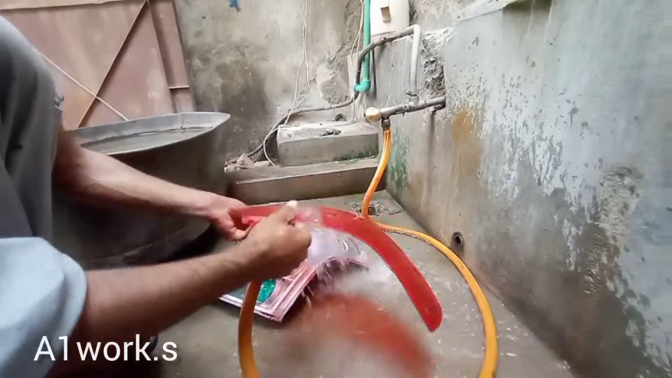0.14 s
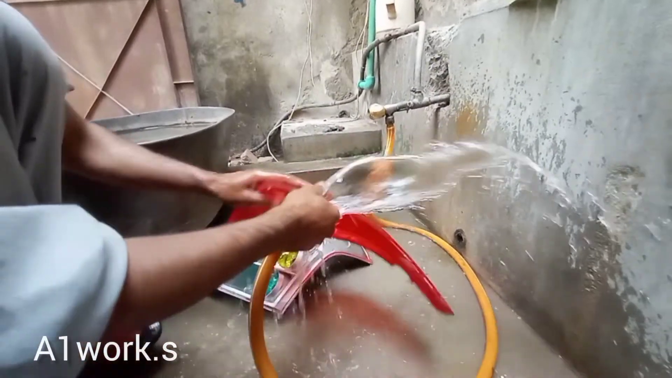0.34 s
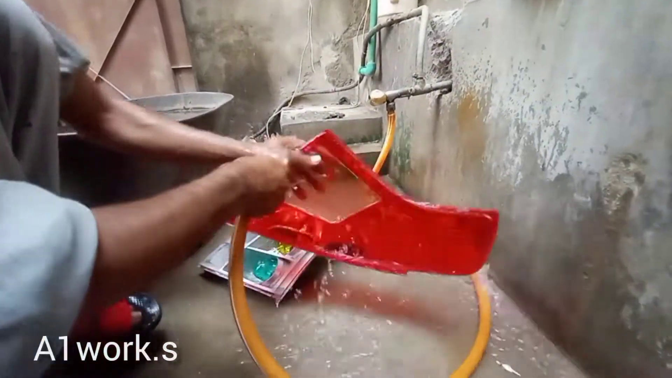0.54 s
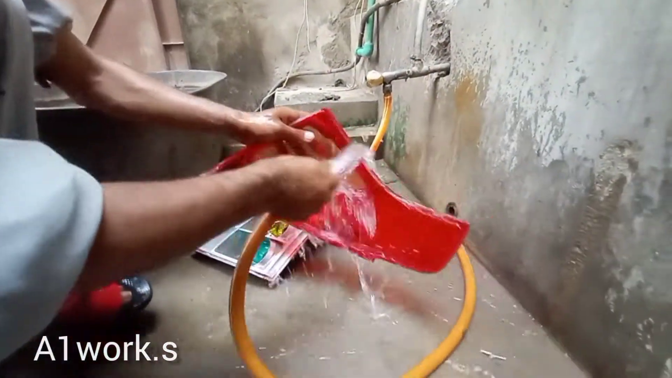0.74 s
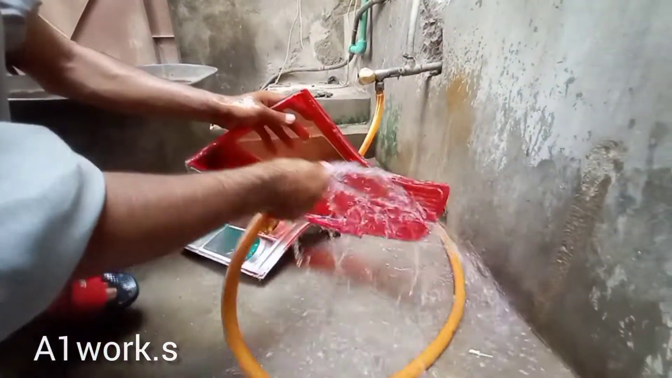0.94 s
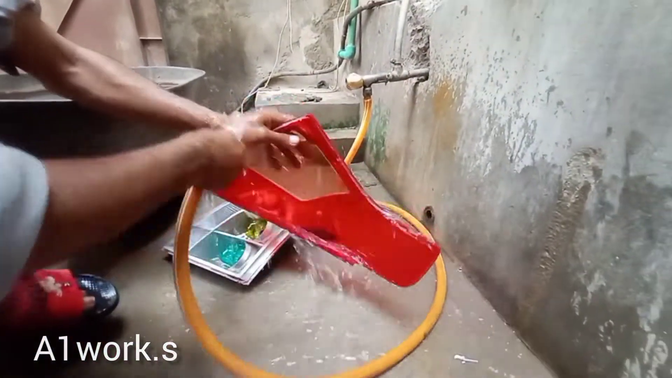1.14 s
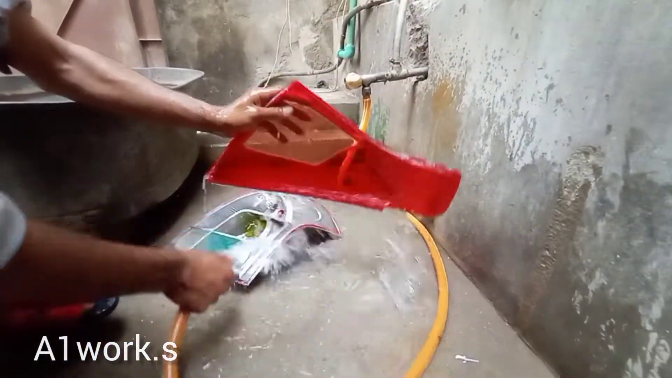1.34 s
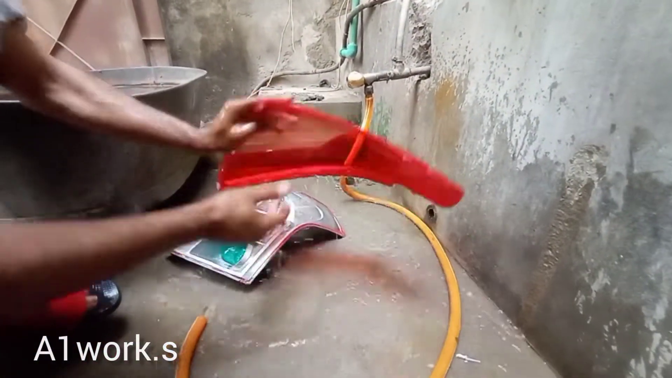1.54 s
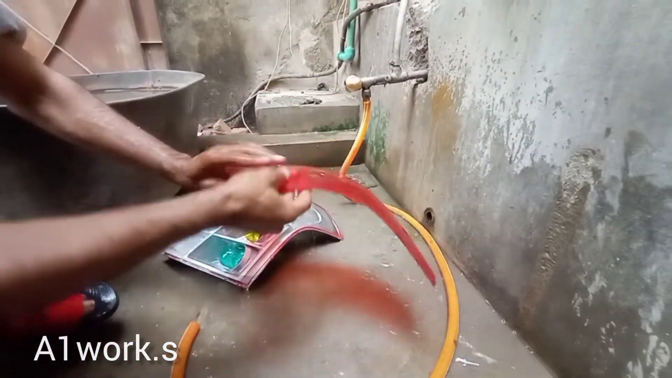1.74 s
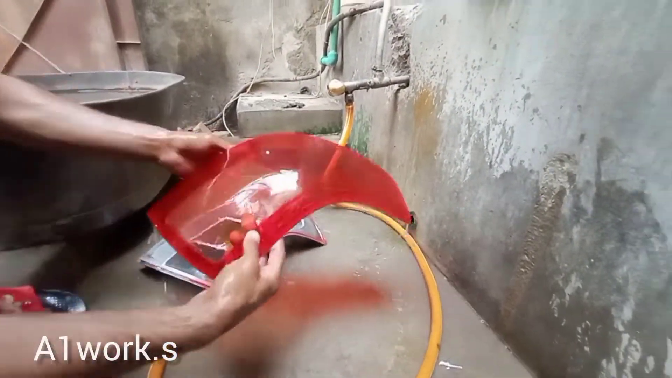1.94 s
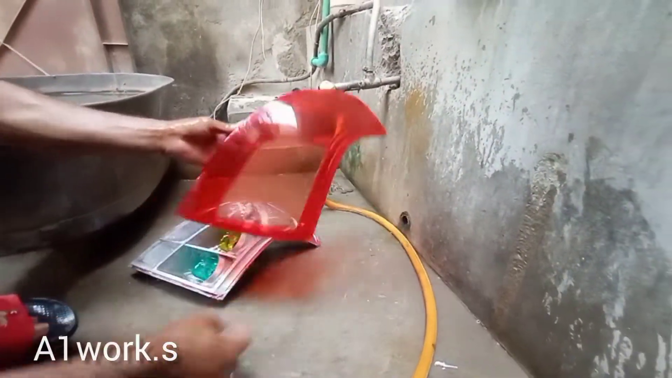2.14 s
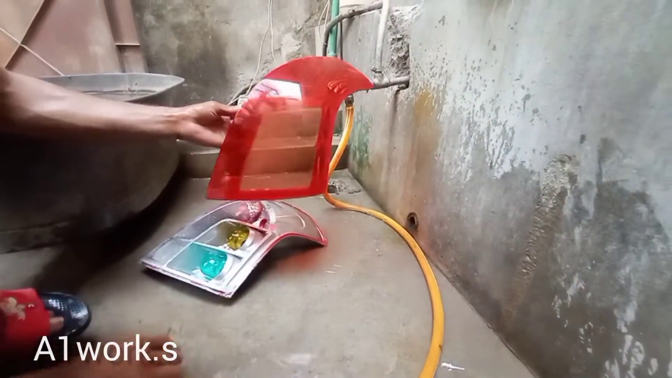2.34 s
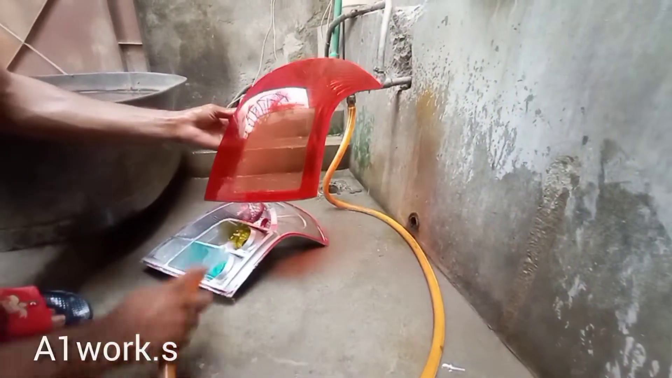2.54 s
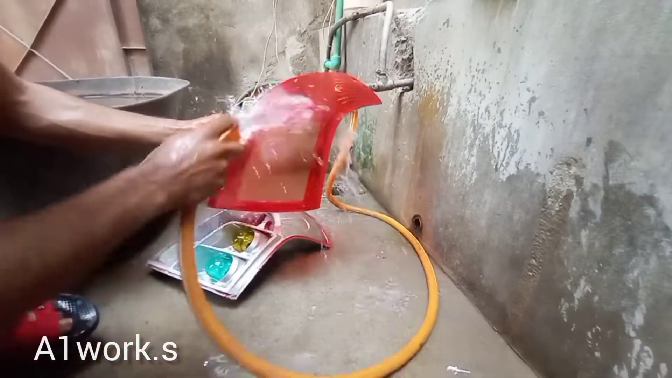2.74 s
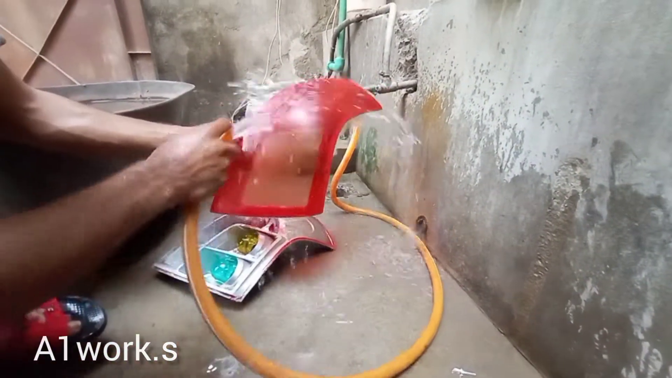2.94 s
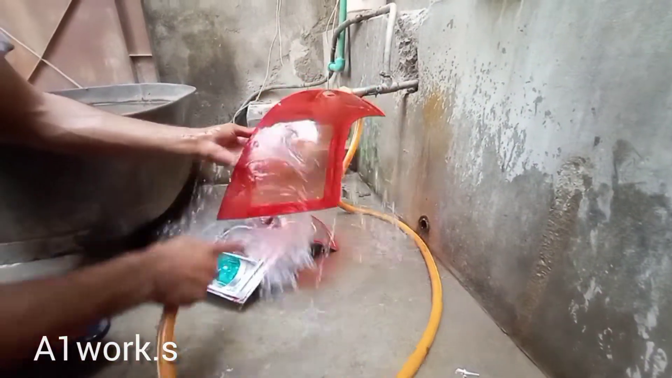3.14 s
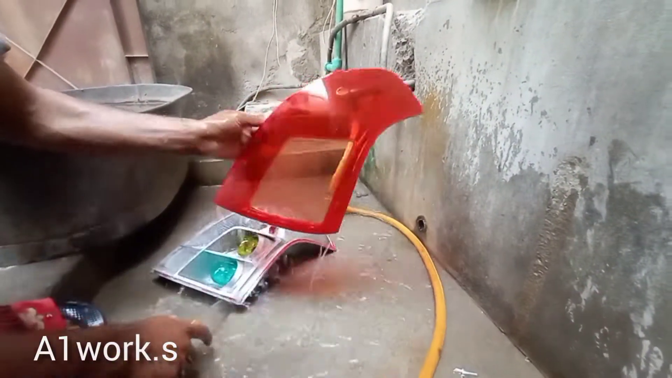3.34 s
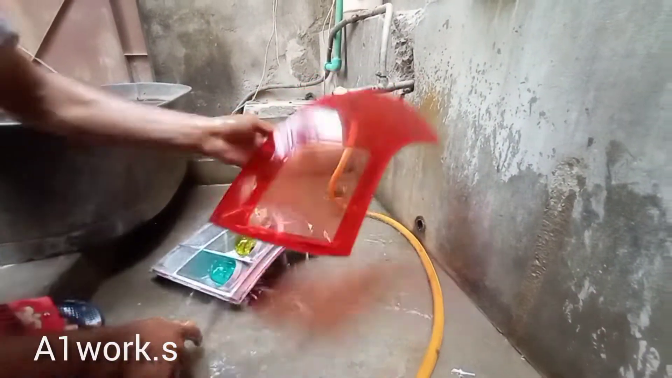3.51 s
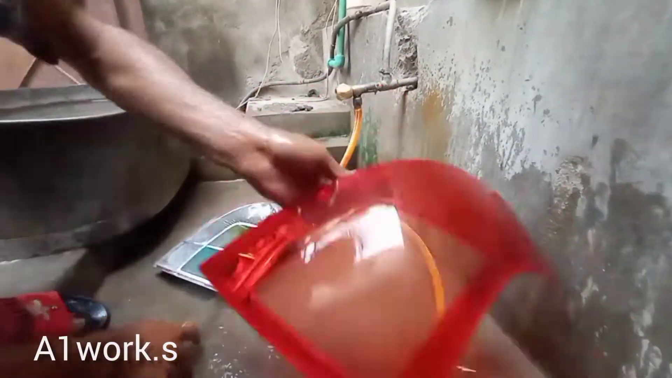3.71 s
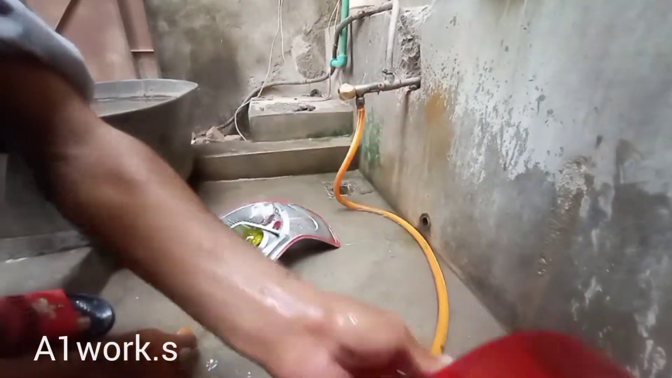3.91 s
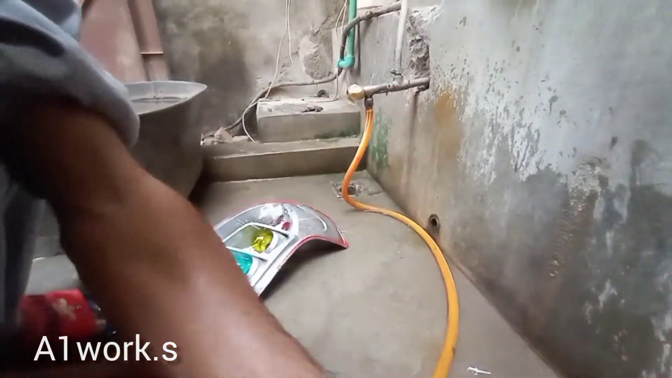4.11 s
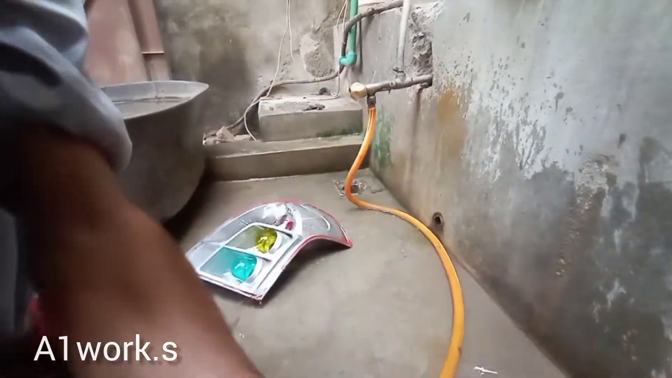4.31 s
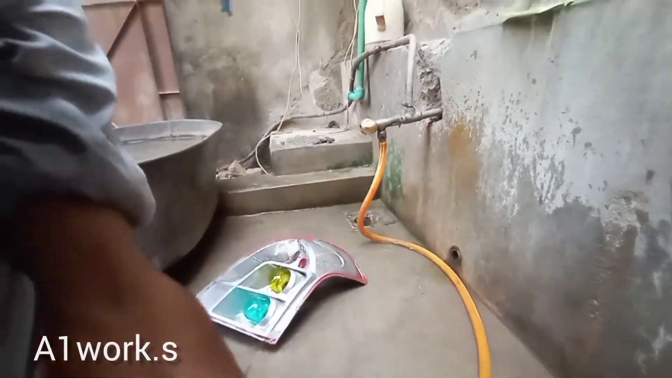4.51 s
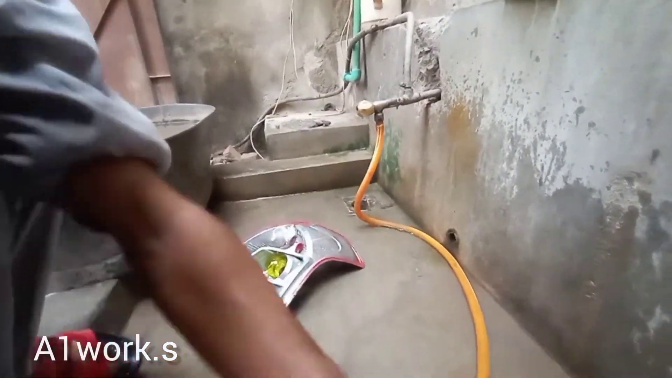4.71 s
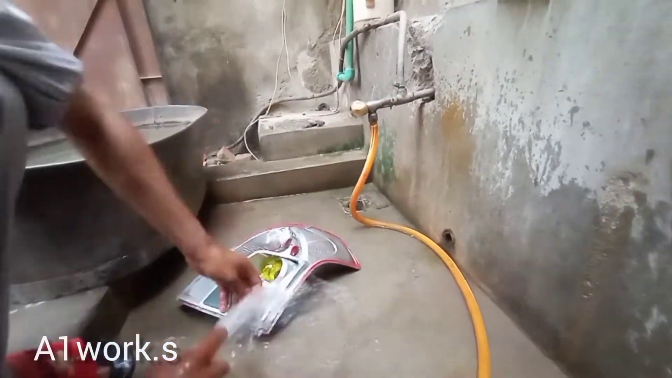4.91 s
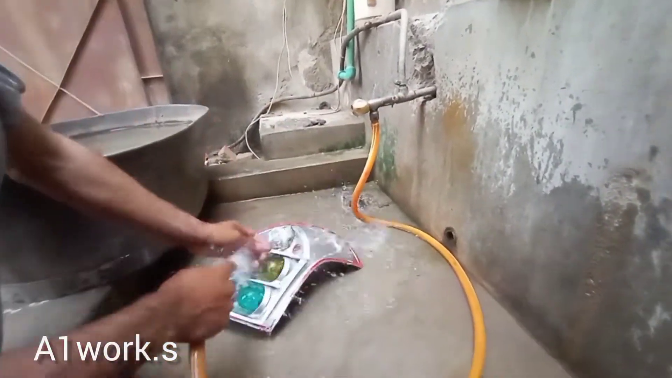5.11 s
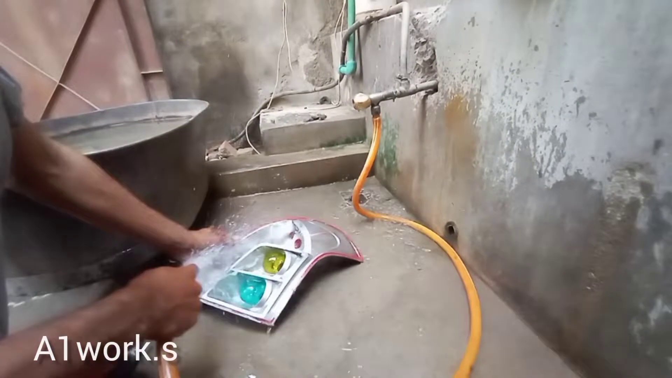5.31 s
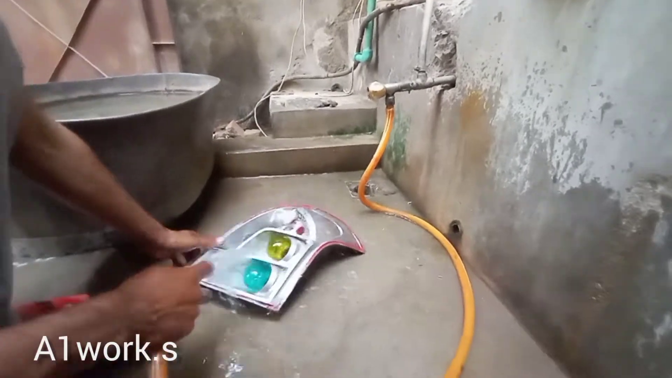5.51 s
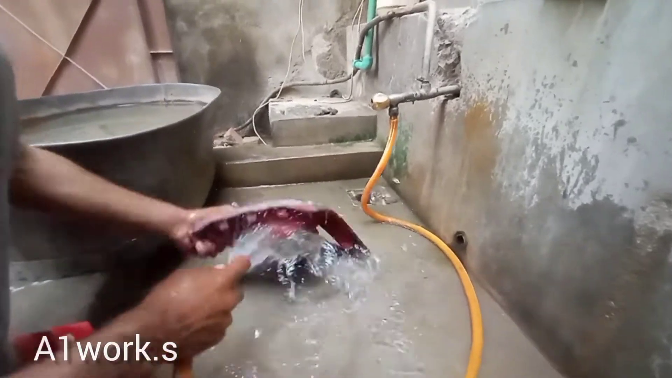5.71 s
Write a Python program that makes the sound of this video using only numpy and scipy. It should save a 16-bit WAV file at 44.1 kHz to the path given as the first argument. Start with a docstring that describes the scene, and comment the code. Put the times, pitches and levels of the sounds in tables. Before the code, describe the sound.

A hose rinses plastic parts in splashy, bubbling bursts, broken by soft hissing, dripping and a shell clattering onto concrete.

```python
"""Water spatters on and off a plastic lamp lens and gurgles over a hand, as a hose rinses the lens in
a small concrete wash yard. Drops tick as they land, and trapped air rings as bubbles.
Between rinses the open hose hisses on the floor, with a low hum like a water pump behind it.
The lens is put down with a clatter; then the jet plays on the lamp housing, which is tipped over
and drums hollowly."""
import sys
import numpy as np
from scipy import signal
from scipy.fft import rfft, irfft, next_fast_len
from scipy.io import wavfile
from scipy.ndimage import uniform_filter1d, map_coordinates

SR = 44100
rng = np.random.default_rng(int(sys.argv[2]) if len(sys.argv) > 2 else 0)


def store_pcm(level_fs):
    """Save levels as 16-bit WAV."""
    pcm = np.round(np.clip(level_fs, -1, 1) * 32767).astype(np.int16)
    wavfile.write(sys.argv[1], SR, np.atleast_2d(pcm).T)


N = 258426
SPRAY_ATTACK_S, SPRAY_RELEASE_S = 0.0064, 0.0031  # how fast a burst of spray starts and stops


def amp(db):
    """Turn decibels into a gain to multiply by."""
    return 10 ** (np.asarray(db) / 20)


def unit(x):
    """Scale x to an average strength (rms) of 1."""
    return x / np.sqrt(np.mean(x ** 2) + 1e-20)


def noise(size=N):
    """White noise: an even hiss."""
    return rng.standard_normal(size)


def along(points, hz):
    """Read between (frequency [Hz], value) points, with octaves evenly spaced."""
    freqs, values = np.transpose(points)
    return np.interp(np.log(hz + 1), np.log(freqs), values)


def curve(rows):
    """Join (time [s], value) points with straight lines, one value per sample."""
    return np.interp(np.arange(N) / SR, *np.transpose(rows))


def spells(rows, attack_s, release_s):
    """Gain of (start [s], length [s], level [dB]) events that rise, hold and die away."""
    t = np.arange(N) / SR
    return sum(amp(db) * np.clip((t - s) / attack_s, 0, 1)
               * np.exp(-np.maximum(t - s - length, 0) / release_s) for s, length, db in rows)


def wobble(rate):
    """A smooth curve through `rate` random values a second."""
    return map_coordinates(noise(int(N * rate / SR) + 4), [np.arange(N) * rate / SR])


def filtered(x, response):
    """Multiply each frequency in x by response(frequency)."""
    size = next_fast_len(len(x) + SR // 4)
    return irfft(rfft(x, size) * response(np.fft.rfftfreq(size, 1 / SR)), size)[:len(x)]


def coloured(x, points):
    """Shape the tone of x with (frequency [Hz], level [dB]) points."""
    return filtered(x, lambda f: amp(along(points, f)))


def tilted(x, slope_db):
    """Brighten or darken x by slope_db per octave, pivoting at 1 kHz."""
    return filtered(x, lambda f: amp(slope_db * np.log2(np.maximum(f, 300) / 1000)))


def resonate(x, modes, order=1):
    """Ring x through (pitch [Hz], width [Hz], level [dB]) resonances; order 2 deepens the valleys."""
    return filtered(x, lambda f: sum(
        (-1) ** k * (amp(db) * 1j * f * width / (hz * hz - f * f + 1j * f * width)) ** order
        for k, (hz, width, db) in enumerate(modes)))


def patchy(x, depth_db):
    """Give x random loud and soft patches, a few hundred Hz wide and some tens of ms long."""
    spectra = signal.stft(x, nperseg=512)[2]
    patches = uniform_filter1d(noise(spectra.shape), size=6, axis=0)
    patches = uniform_filter1d(patches, size=7, axis=1)
    return signal.istft(spectra * amp(depth_db * unit(patches)), nperseg=512)[1][:N]


def add(track, s, sound):
    """Mix a sound into the track, starting at s seconds."""
    part = track[max(round(s * SR), 0):][:len(sound)]
    part += sound[:len(part)]


def pings(start, hz, gain, cycles, rise, total, size):
    """Mix tones of `size` samples that fade over `cycles` and climb by the share `rise` in pitch."""
    t = np.arange(size) / SR
    hz = np.clip(hz, 200, 15000)[:, None]
    age = t * hz / cycles
    envelope = gain[:, None] * np.exp(-age) * (1 - np.exp(-2 * t * hz))
    waves = envelope * np.sin(2 * np.pi * hz * t * (1 + rise * np.tanh(age / 2)))
    index = (start * SR).astype(int)[:, None] + np.arange(size)
    return np.bincount(index.ravel(), waves.ravel(), total)[:total]


def shower(hz, octaves, cycles, rise, spread_db, count, size):
    """Drops or bubbles at random times, a few much larger than the rest, at an even average level."""
    when, pitch, rank = rng.random((count, 3)).T
    gain = amp(-spread_db * np.log(np.maximum(rank, .01)))
    x = pings(when * N / SR, hz * 2 ** (octaves * (2 * pitch - 1)), gain, cycles, rise, N, size)
    return x / np.sqrt(np.abs(uniform_filter1d(x * x, size=4000)) + 1e-9)


def bursts(rows, octaves, cycles, rise, count, size):
    """A quick, fading cluster of pings for each (time [s], peak [dB], pitch [Hz], length [s]) row."""
    out = np.zeros(N)
    for s, db, hz, length in rows:
        late = (np.arange(count) + rng.random(count)) / count
        gain = np.exp(-2 * late) * np.minimum(late * 6 + 0.77, 1) * rng.choice([-1, 1], count)
        pitch = hz * 2 ** (octaves * rng.permutation(np.linspace(-1, 1, count)))
        cluster = pings(late * length, pitch, gain, cycles, rise, SR // 10, size)
        add(out, s, amp(db) * cluster / np.abs(cluster).max())
    return out


def yard(x):
    """The close concrete walls answer with a short echo whose treble dies first."""
    # how long the echo lasts: (frequency [Hz], time to fade by 60 dB [s])
    fade_times = [(200, 0.41), (2000, 0.1), (12000, 0.013)]
    hz, t, spectra = signal.stft(noise(SR // 3), SR, nperseg=256)
    tail = signal.istft(spectra * amp(-60 * t / along(fade_times, hz)[:, None]), SR, nperseg=256)[1]
    delayed = np.pad(x, (SR // 200, 0))
    return signal.fftconvolve(delayed, tail / np.linalg.norm(tail))[:N]


def drone():
    """A pump-like hum comes and goes, with a low rumble that partly follows it."""
    # spells of humming: (start [s], length [s], relative level [dB])
    hum_spells = [(0, 0.14, -55), (.25, 0.43, -53.5), (.92, 0.34, -56), (1.55, 0.18, -55.5),
                  (1.77, 0.2, -56), (2.14, 0.29, -59), (2.68, 0.061, -62), (2.86, 0.21, -56.5),
                  (3.15, 0.19, -55), (3.42, 0.12, -58.5), (3.64, 0.356, -54), (4.2, 0.45, -63.5),
                  (4.43, 0.011, -56.5), (4.6, 0.16, -51.5), (4.88, 0.037, -55), (5.02, 0.2, -54),
                  (5.29, 0.33, -54)]
    # the yard's rumble: (time [s], base level [dB])
    rumble_levels = [(0, -58), (.65, -57.5), (.76, -55.5), (1, -56.5), (1.22, -54), (1.45, -58), (2.2, -57),
                     (2.8, -56), (3.4, -59.5), (4.2, -56.5), (4.5, -51), (4.95, -54), (5.5, -52.5),
                     (5.86, -57)]
    # its tone: (frequency [Hz], level [dB])
    rumble_tone = [(20, -16), (40, -20.5), (65, -4), (95, 3.5), (125, -2.5), (170, -2.5), (230, -18.5),
                   (400, -45), (1500, -61)]
    hum_hz, idle_db = 145.3, -71.5
    hum_db = 20 * np.log10(np.hypot(amp(idle_db), spells(hum_spells, attack_s=0.0052, release_s=0.011)))
    rumble_db = curve(rumble_levels) + 0.31 * (hum_db - hum_db.mean())
    hum = np.sin(2 * np.pi * np.cumsum(hum_hz + 2.43 * wobble(14)) / SR)
    rumble = unit(coloured(noise(), rumble_tone))
    return amp(hum_db + 6.5 + 2.1 * wobble(25)) * hum + amp(rumble_db) * rumble


def hose():
    """Swirling water hisses in the hose and its mouth; the pitch drifts as the hose flexes."""
    # resonances of the hose: (pitch [Hz], width [Hz], relative level [dB])
    pipe_modes = [(343, 85, 0), (619, 86, 4.5), (1250, 320, -24), (1940, 470, 4), (2223, 166, 8),
                  (3110, 550, 3.5), (4090, 300, -2), (5460, 700, 2)]
    # those of its mouth inside the fist: (pitch [Hz], width [Hz], relative level [dB])
    mouth_modes = [(347, 58, -3), (591, 132, 2), (1124, 196, 0.5), (1856, 270, -7), (2250, 250, -6)]
    # rush of the flow: (time [s], level [dB])
    flow_levels = [(0, -62), (.2, -57), (.35, -57), (.7, -55), (1.15, -65.5), (1.38, -53), (1.75, -57),
                   (2.4, -54.5), (2.75, -58.5), (3.3, -59), (3.63, -61), (3.8, -60.5), (4.05, -57.5),
                   (4.3, -55), (4.6, -56.5), (4.9, -57.5), (5.86, -53.5)]
    # the fist narrows the mouth: (start [s], length [s], level [dB])
    squeezes = [(-.1, 1.54, -60)]
    # the hose's second resonance sings briefly: (start [s], length [s], level [dB])
    hoots = [(1.215, 0.034, -50.5), (1.66, 0.088, -63), (2.0, 0.09, -64), (4.11, 0.085, -59.5),
             (4.72, 0.12, -69.5)]
    open_mouth_db, drift_share = -81, .01
    squeeze = amp(open_mouth_db) + spells(squeezes, attack_s=0.11, release_s=0.41)
    pipe = unit(resonate(patchy(noise(), depth_db=2.8), pipe_modes, order=2))
    mouth = unit(resonate(noise(), mouth_modes, order=2))
    hoot = unit(resonate(noise(), [pipe_modes[1]], order=2))
    hiss = amp(curve(flow_levels) + 0.67 * wobble(30.02)) * pipe
    hiss += squeeze * amp(2.0 * wobble(25.26)) * mouth
    hiss += spells(hoots, attack_s=0.0048, release_s=0.016) * hoot
    lead = np.cumsum(drift_share * wobble(6))  # reading faster or slower bends the pitch
    return map_coordinates(hiss, [np.arange(N) + lead], mode="mirror")


def dribble():
    """Run-off trickles over the wet floor in soft patches, with single drips among them."""
    # the trickle: (time [s], level [dB])
    levels = [(0, -62), (2.4, -69.5), (3.62, -63.5), (3.9, -63), (4.3, -67), (4.58, -76), (4.69, -67),
              (4.76, -55.5)]
    # its tone: (frequency [Hz], level [dB])
    tone = [(400, -30), (1500, -21), (3500, -7.5), (4800, -7.5), (6000, 4.5), (7500, -8), (10000, -16.5),
            (16000, -19.5)]
    runs = shower(hz=3860, octaves=1.0, cycles=20, rise=0, spread_db=2, count=5000, size=800)
    trickle = unit(coloured(patchy(runs + amp(-2.5) * noise(), depth_db=2.6), tone))
    drips = shower(hz=2200, octaves=1.5, cycles=14, rise=.08, spread_db=1.5, count=200, size=1600)
    return amp(curve(levels) + 1.6 * wobble(25)) * (trickle + amp(-8.5) * unit(drips))


def laps():
    """Small runs of water lap on the floor, each swelling and fading around its own pitch."""
    # runs of water: (time [s], level [dB], pitch [Hz], length [s])
    runs = [(1.57, -57, 3950, 0.032), (1.67, -59, 3900, 0.084), (1.92, -59, 5700, 0.086),
            (2.005, -60, 636, 0.13), (2.039, -53, 1800, 0.06), (2.049, -57, 3930, 0.079),
            (2.115, -58.5, 3360, 0.075), (2.205, -56.5, 3760, 0.097), (2.219, -58.5, 620, 0.017),
            (2.444, -57, 5500, 0.054), (3.528, -54.5, 3600, 0.018), (3.658, -59, 3860, 0.11),
            (3.735, -60, 4960, 0.077), (3.894, -63, 4470, 0.083), (4.148, -58.5, 3370, 0.071),
            (4.203, -59, 3670, 0.031), (4.619, -54.5, 1670, 0.051), (4.65, -56.5, 3800, 0.028)]
    width_share = 0.26
    out = np.zeros(N)
    for s, db, hz, length in runs:
        swell = np.hanning(int(length * SR))
        wash = unit(resonate(noise(SR // 4), [(hz, width_share * hz, 0)], order=2))
        add(out, s, amp(db) * swell * unit(wash[:len(swell)]))
    return out


def slop(count=70):
    """A sliding sheet of water traps ever larger bubbles, so its splash falls in pitch."""
    # water leaving the lens: (start [s], length [s], level [dB], first pitch [Hz], last pitch [Hz])
    sheets = [(1.386, .085, -53, 2360, 465)]
    out = np.zeros(N)
    for s, length, db, first_hz, last_hz in sheets:
        late = (np.arange(count) + rng.random(count)) / count
        hz = first_hz * (last_hz / first_hz) ** late * 2 ** rng.normal(0, 0.18, count)
        gain = np.sin(np.pi * late) * rng.choice([-1, 1], count)
        splash = pings(late * length, hz, gain, cycles=1.8, rise=0, total=SR // 5, size=1200)
        add(out, s, amp(db) * splash / np.sqrt(np.sum(splash ** 2) / (length * SR)))
    return out


def gurgle():
    """Crowded bubbles ring in the water that the jet churns; pouring water adds a slosh."""
    # churning in each of the three rinses: (level relative to the jet [dB])
    churn_db = [-15, -6.5, -7]
    # pooled water pours off the plastic: (start [s], length [s], relative level [dB])
    pours = [(.02, 0.08, -59), (.82, 0.062, -55), (1.28, 0.13, -53.5), (1.41, 0.032, -49),
             (1.46, 0.064, -53.5), (1.55, 0.19, -63), (2.01, 0.073, -62.5), (2.76, 0.13, -63),
             (3.3, 0.233, -69.5), (5.13, 0.017, -56), (5.26, 0.057, -49.5), (5.44, 0.12, -56),
             (5.77, 0.14, -50)]
    # tone of its fall on the concrete: (frequency [Hz], level [dB])
    slosh_tone = [(120, -17), (270, -12.5), (450, -11), (800, 2.5), (1400, 9), (2200, 10), (5000, -10),
                  (12000, -35)]
    churn = amp(-88) + amp(churn_db) @ rinses()  # the wet floor always bubbles faintly
    pour = spells(pours, attack_s=0.0058, release_s=0.011)
    bubbles = shower(hz=1680, octaves=.5, cycles=10, rise=.03, spread_db=3.5, count=4000, size=1200)
    slosh = shower(hz=900, octaves=1.8, cycles=2, rise=0, spread_db=3, count=7000, size=650)
    slosh = unit(coloured(slosh, slosh_tone))
    water = (churn + amp(-4.5) * pour) * bubbles + (amp(-17.5) * churn + amp(3.5) * pour) * slosh
    return amp(-3.5 + 2.1 * wobble(21.02)) * water


def gulps():
    """Each pocket of air rings as one large bubble, rising in pitch as it surfaces, amid a cluster."""
    # air gulped under water: (time [s], level [dB], pitch [Hz], share in the large bubble [0-1])
    pockets = [(.182, -40, 1020, 0.33), (.195, -38.5, 874, 0.2), (.474, -37, 2305, .4),
               (.53, -62, 340, 0.25), (.815, -49, 404, 0.2), (.865, -50.5, 315, 0.34),
               (1.281, -38, 3530, 0.6), (1.333, -37, 4040, .6), (1.439, -51, 397, 0.25),
               (1.459, -35.5, 1304, .8), (1.497, -50.5, 324, 0.54), (2.029, -55, 387, 0.1),
               (2.21, -63, 345, 0.4), (2.454, -39, 1950, .05), (2.458, -43, 1414, 0.2),
               (2.532, -44.5, 1137, 0.4), (2.605, -46, 1000, 0.15), (2.617, -45, 856, 0.23),
               (2.713, -54, 329, 0.65), (2.756, -38.5, 1560, 0.04), (2.811, -45, 787, .4),
               (2.853, -40.5, 1390, 0.1), (2.91, -39, 2180, .4), (2.944, -36, 847, 0.62),
               (2.949, -33, 1540, .15), (3.019, -36, 1810, 0.05), (3.144, -39, 1700, 0.6),
               (3.228, -58, 520, 0.45), (3.237, -41.5, 1784, 0.5), (3.284, -35.5, 1940, 0.5),
               (3.305, -49, 1240, .4), (3.322, -53, 351, .3), (3.326, -54, 547, .3),
               (3.365, -50.5, 604, 0.9), (3.439, -46.5, 1480, 0.7), (3.485, -56, 425, 0.2),
               (3.492, -53, 1406, 0.5), (4.996, -35.5, 1720, 0.43), (4.998, -47.5, 890, 0.1),
               (5.144, -47.5, 507, 0.6), (5.272, -37, 1140, 0), (5.278, -32, 1490, 0.4),
               (5.298, -46.5, 478, 0.55), (5.315, -53, 322, .3), (5.382, -44, 511, 0.46),
               (5.436, -35.5, 1490, 0.4), (5.458, -48, 485, 0.5), (5.461, -42, 1020, 0.45),
               (5.698, -31.5, 1375, 0.36), (5.718, -38, 950, 0), (5.744, -37, 492, 0.7),
               (5.84, -31, 1300, 0.57)]
    swell_s, ring_cycles, glide_share = 0.0039, 15.5, 0.081
    clusters = [(s, db + 10 * np.log10(max(1 - share, .01)), hz, .02) for s, db, hz, share in pockets]
    out = bursts(clusters, octaves=0.18, cycles=5.2, rise=0.032, count=12, size=2000)
    t = np.arange(SR // 8) / SR
    for s, db, hz, share in pockets:
        age = t * hz / ring_cycles
        swell = (1 - np.exp(-(t / swell_s) ** 2)) * np.exp(-age)
        phase = 2 * np.pi * np.cumsum(hz * (1 + glide_share * np.tanh(age / 2))) / SR
        add(out, s, amp(db) * share * swell / swell.max() * np.sin(phase))
    return out


def knocks():
    """The springy plastic shell hits concrete, chatters and fades; each spot struck rings one note."""
    # knocks: (time [s], level [dB], chatter [s], fade [s], brightness [dB per octave],
    # note [Hz], note's relative level [dB])
    hits = [(4.361, -35, 0.0095, .008, 0, 1385, -4), (4.417, -38.5, 0.0061, 0.018, -3.5, 713, -2),
            (4.457, -31, 0.013, 0.0058, 0.5, 1206, -4), (4.491, -41, .005, 0.025, 1, 1190, -10),
            (4.528, -31, 0.0044, 0.019, -1, 916, -10), (4.551, -38.5, 0.007, 0.018, -3, 1190, -1.5),
            (5.579, -29.5, 0.0095, 0.0025, -0.5, 495.6, -2)]
    # the shell's clack: (pitch [Hz], width [Hz], level [dB])
    shell_modes = [(470, 53, -4), (617, 48, -2), (754, 45, 1), (950, 102, 0.5), (1175, 51, 2.5),
                   (1303, 54, -1), (1444, 110, 0), (1713, 125, -2.5), (2070, 73, -4), (2420, 220, -6),
                   (3090, 1050, -15.5), (6300, 1300, -22.5)]
    # its low thud: (pitch [Hz], width [Hz], relative level [dB])
    thud_modes = [(334, 170, -3), (217, 57, -4)]
    contact_s = 0.00027
    tail_s, ring_cycles = .17, 106  # how long the tail and the note take to lose 60 dB
    out, t = np.zeros(N), np.arange(SR // 4) / SR
    contact = 1 - np.exp(-t / contact_s)
    for s, db, chatter, fade, bright_db, ring_hz, ring_db in hits:
        after = np.maximum(t - chatter, 0)
        touch = contact * np.interp(t, [0, chatter], [0.98, 1]) * np.exp(-after / fade)
        tail = tilted(noise(len(t)), slope_db=-6.5) * contact * amp(-19 - 60 * t / tail_s)
        clack = resonate(tilted(noise(len(t)), bright_db) * touch + tail, shell_modes)
        clack *= np.linalg.norm(touch) / np.linalg.norm(clack)
        crack = amp(-28.5) * touch * noise(len(t))
        ring_gain = amp(ring_db - 60 * after * ring_hz / ring_cycles) * (1 - np.exp(-t / chatter))
        ring = ring_gain * np.sin(2 * np.pi * ring_hz * t)
        thud = resonate(noise(len(t)) * touch, thud_modes, order=2)
        add(out, s, amp(db) * (clack + crack + ring + amp(-14.5) * thud / np.abs(thud).max()))
    return out


def drumming():
    """Drops beat inside the upturned housing and make its hollow ring."""
    # the jet inside the housing as it is tipped over: (time [s], level [dB])
    levels = [(5.1, -79), (5.17, -59.5), (5.4, -57.5), (5.6, -56), (5.65, -37), (5.69, -68), (5.73, -43.5),
              (5.78, -34.5), (5.82, -33), (5.86, -44)]
    # resonances of the hollow: (pitch [Hz], width [Hz], level [dB])
    hollow_modes = [(484, 42, -6.5), (880, 120, -13), (1301, 106, 0), (1560, 120, -5.5), (2550, 70, -3.5)]
    # tone of water beating on its walls: (frequency [Hz], level [dB])
    wall_tone = [(80, -26), (220, -1.5), (450, -7), (1000, -4.5), (2500, 11.5), (5000, -14), (12000, -33)]
    beats = shower(hz=1345, octaves=2.25, cycles=0.79, rise=0, spread_db=2.5, count=9000, size=200)
    hollow = unit(resonate(beats, hollow_modes))
    walls = unit(coloured(np.roll(beats, SR), wall_tone))
    return amp(curve(levels)) * (hollow + amp(-9.0) * walls)


def splats():
    """Larger blobs of water slap the plastic, burst into droplets and leave bubbles ringing briefly."""
    # blobs landing: (time [s], relative peak [dB], pitch [Hz], length [s])
    blobs = [(.009, -35, 3250, 0.0089), (0.029, -35, 3650, 0.014), (0.076, -30, 6280, 0.006),
             (0.122, -37.5, 6260, 0.0097), (0.284, -30.5, 5340, 0.014), (0.314, -31.5, 5830, 0.0068),
             (0.334, -34.5, 6100, 0.0095), (.451, -34, 5040, 0.0073), (0.473, -34.5, 2510, 0.017),
             (0.501, -34, 3100, 0.011), (0.761, -32, 5150, 0.0046), (0.84, -38, 5260, 0.01),
             (.866, -35, 4400, 0.0099), (0.888, -34, 3980, .01), (0.936, -35.5, 5670, 0.0076),
             (0.973, -32, 4540, 0.011), (1.022, -33.5, 6240, .008), (1.281, -29, 3560, 0.011),
             (1.336, -38, 3930, .01), (1.637, -33.5, 6800, 0.0087), (2.319, -35.5, 2840, 0.023),
             (2.512, -36, 3600, 0.0089), (2.536, -30.5, 3770, 0.0073), (2.562, -35.5, 2500, .01),
             (2.725, -35.5, 2910, .008), (2.765, -35, 3640, .018), (2.772, -33, 5540, 0.011),
             (2.888, -32, 5600, 0.0057), (2.949, -37, 1375, .016), (3.053, -30, 3870, .007),
             (3.074, -30.5, 5810, .012), (3.283, -33.5, 3700, 0.011), (3.381, -41, 5800, 0.0065),
             (3.584, -38, 6560, 0.0092), (4.818, -37.5, 5760, 0.006), (5.042, -37, 2200, .01),
             (5.227, -33, 2520, .018), (5.284, -34, 2940, 0.012), (5.375, -33.5, 1625, 0.026),
             (5.396, -33, 1860, .016), (5.671, -32.5, 2570, .009), (5.697, -32, 5850, .007)]
    slap = bursts(blobs, octaves=0.18, cycles=3.5, rise=0, count=12, size=500)
    droplets = bursts([(s, db, 1.4 * hz, 1.5 * length) for s, db, hz, length in blobs],
                      octaves=1.0, cycles=0.62, rise=0, count=36, size=100)
    ring = bursts([(s, db, .85 * hz, 1.6 * length) for s, db, hz, length in blobs],
                  octaves=0.414, cycles=19, rise=0.055, count=6, size=1600)
    return amp(.5) * slap + amp(-4.0) * droplets + amp(-13) * ring


def rinses():
    """The jet's strength as a gain, one row for each rinse: lens, lens again, housing."""
    # force of the jet, one list per rinse: (time [s], level [dB])
    forces = [
        [(0, -45.5), (.15, -47.5), (.25, -53.5), (.34, -52.5), (.41, -52), (.56, -49.5), (.7, -53),
         (.93, -44.5), (1.12, -52.5), (1.36, -46.5), (1.53, -52.5), (1.59, -60.5), (1.7, -59.5), (1.8, -76)],
        [(2.46, -71), (2.5, -54), (2.62, -56), (2.67, -62), (2.79, -49), (2.92, -48.5), (3.12, -45.5),
         (3.21, -46), (3.33, -54), (3.55, -60.5), (3.61, -87)],
        [(4.71, -64), (4.74, -60.5), (4.88, -59.5), (4.915, -47.5), (5, -45.5), (5.08, -43), (5.2, -42),
         (5.56, -41), (5.62, -58), (5.73, -36.5), (5.86, -42.5)],
    ]
    t = np.arange(N) / SR
    return amp([np.interp(t, *np.transpose(rows), left=-np.inf, right=-np.inf) for rows in forces])


def spatter_level():
    """How hard the water lands, in dB: the rinses plus short bursts of spatter."""
    # jet surges, and drops shaken off as the lens is put down: (start [s], length [s], level [dB])
    short_bursts = [(.45, 0.069, -45.5), (.828, 0.018, -46.5), (.843, 0.05, -44), (1.215, 0.026, -44.5),
                    (1.28, 0.091, -45), (1.415, 0.024, -48), (2.06, 0.073, -63.5), (2.53, 0.042, -45.5),
                    (2.885, 0.054, -49.5), (3.14, 0.048, -43.5), (4.42, 0.14, -59.5), (4.94, 0.062, -40),
                    (5.21, 0.043, -39.5)]
    burst_gain = spells(short_bursts, SPRAY_ATTACK_S, SPRAY_RELEASE_S)
    return 10 * np.log10(rinses().sum(0) ** 2 + burst_gain ** 2 + 1e-9)


def spatter(level_db):
    """Drops tick down in clumps among tiny bubbles; on the housing the spray is finer and steadier."""
    # how the jet breaks up in each of the three rinses: (coarseness [0-1])
    coarseness = [1, 1, .5]
    # tone of the drops: (frequency [Hz], level [dB])
    tone = [(150, -30), (400, -32), (820, -39), (1450, -5), (1800, -1.5), (2200, -6.5), (2600, -4.5),
            (3700, 3), (4700, -2), (5800, 5), (9000, -5.5), (16000, -5.5)]
    ticks = shower(hz=5200, octaves=1.68, cycles=1.0, rise=0, spread_db=2.8, count=12000, size=96)
    fizz = shower(hz=3900, octaves=.9, cycles=18, rise=0, spread_db=3.0, count=6000, size=800)
    coarse = np.array(coarseness)[rinses().argmax(0)]
    drops = unit(coloured(coarse * (ticks + amp(0.5) * fizz) + noise(), tone))
    clumps_db = coarse * (1.8 * wobble(70) + 1.4 * wobble(170))
    return drops * amp(level_db + clumps_db + 1.1)


def splashing():
    """A hard jet throws a fine, hissing mist; a slack one leaves only soft splashes."""
    # the jet bursts into haze on the tipped housing: (start [s], length [s], level [dB])
    haze_spells = [(5.695, .17, -47)]
    # tone of that haze: (frequency [Hz], level [dB])
    haze_tone = [(3000, -53), (7000, -19), (9000, -1.5), (16000, 0.5)]
    mist_hz, full_mist_db = 8000, -56
    level_db = spatter_level()
    water = spatter(level_db) + splats()
    mist_db = 3.5 - 1.5 * np.maximum(full_mist_db - level_db, 0)
    mist = filtered(water, lambda f: 1 / (1 + (mist_hz / (f + 1)) ** 8))  # the water's top treble
    haze_gain = spells(haze_spells, SPRAY_ATTACK_S, SPRAY_RELEASE_S) * amp(3.8 * wobble(60))
    haze = haze_gain * unit(coloured(noise(), haze_tone))
    return water + mist * (amp(mist_db + wobble(45)) - 1) + haze


def scene():
    """Water and plastic close by, their echo, and the hose and hum behind, in one channel."""
    near = splashing() + dribble() + laps() + gurgle() + slop() + gulps() + drumming() + knocks()
    return (near + amp(-16.5) * yard(near) + hose() + drone())[None]


def record(dry):
    """A phone microphone has a deep dip in the treble and cuts off the very top."""
    # the microphone's tone: (frequency [Hz], gain [dB])
    tone = [(20, -5.5), (6200, -2.5), (7000, -6.5), (8200, -12), (9400, -22), (11400, -19.5), (13200, -5),
            (15500, -2.5)]
    top_hz = 15850
    return np.array([filtered(coloured(x, tone), lambda hz: hz < top_hz) for x in dry])


dry = scene()
out = record(dry)
store_pcm(out)
```